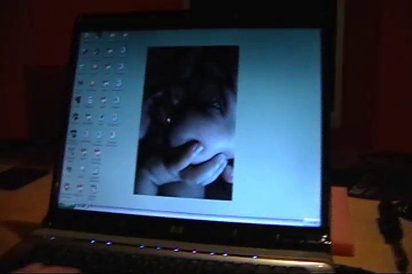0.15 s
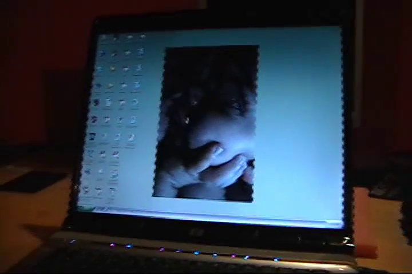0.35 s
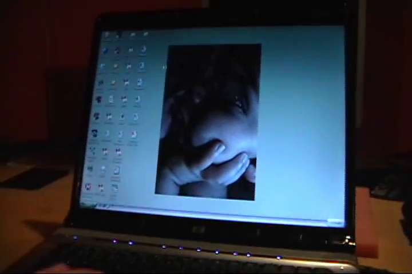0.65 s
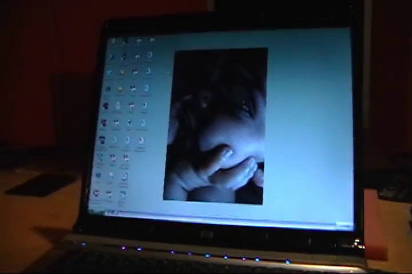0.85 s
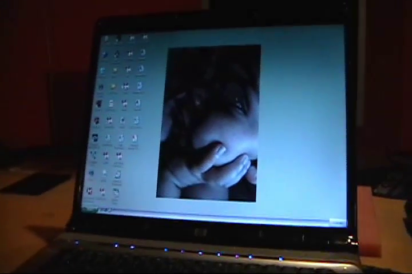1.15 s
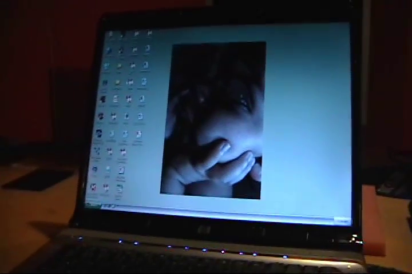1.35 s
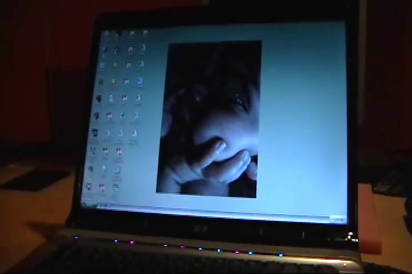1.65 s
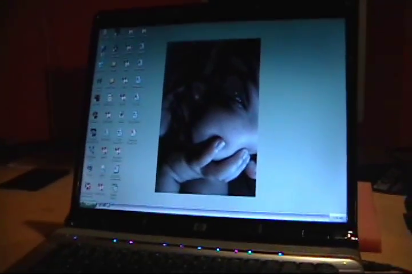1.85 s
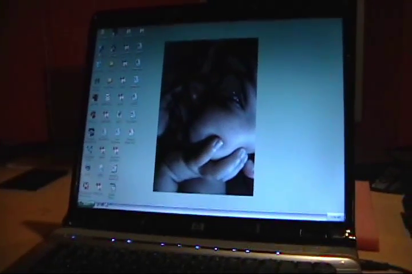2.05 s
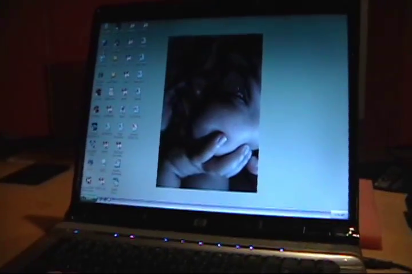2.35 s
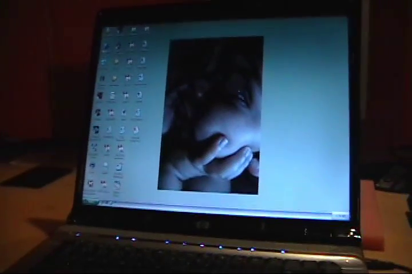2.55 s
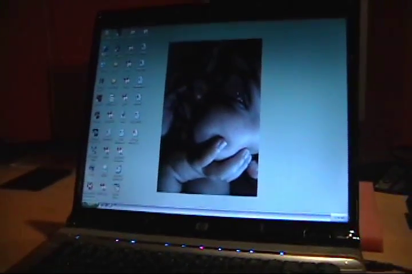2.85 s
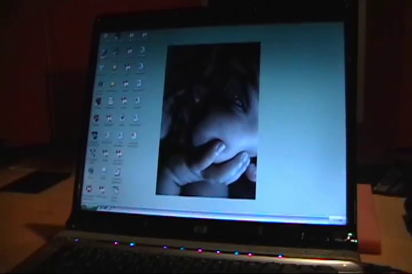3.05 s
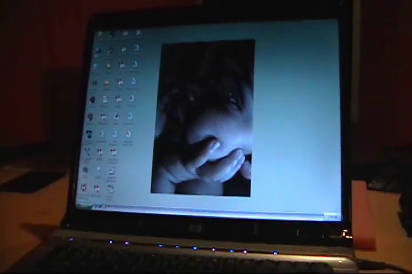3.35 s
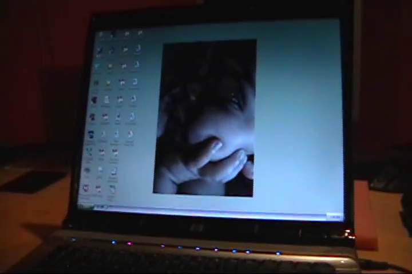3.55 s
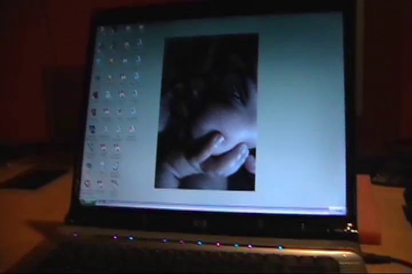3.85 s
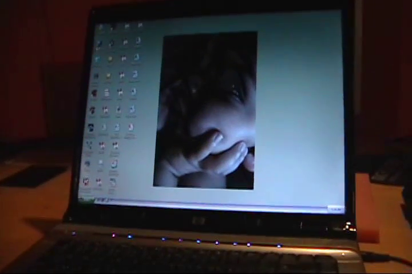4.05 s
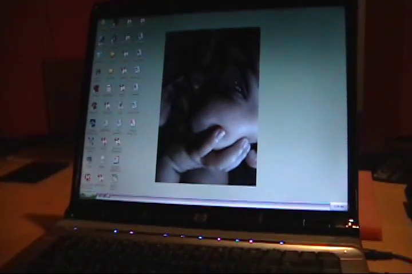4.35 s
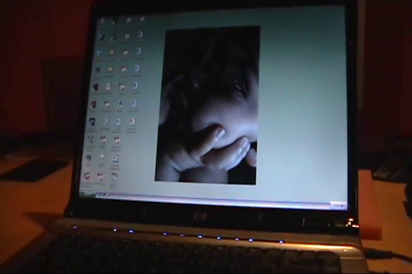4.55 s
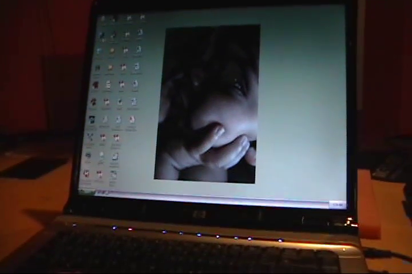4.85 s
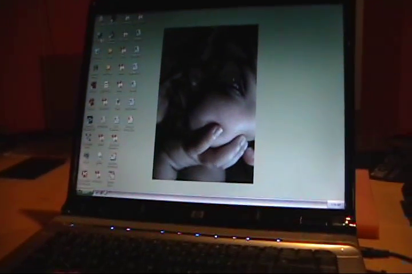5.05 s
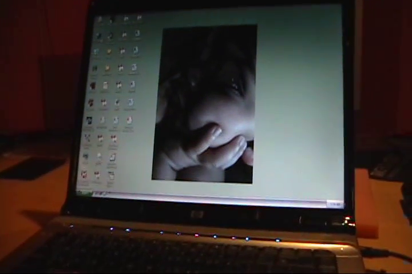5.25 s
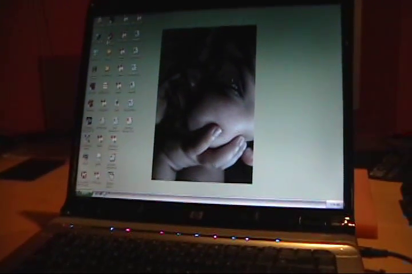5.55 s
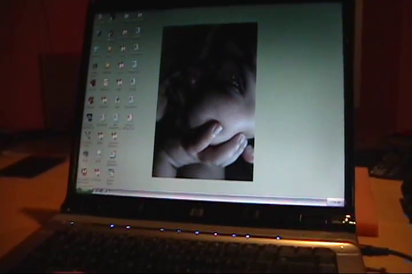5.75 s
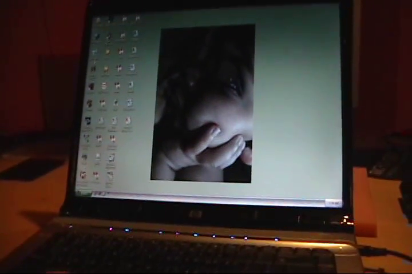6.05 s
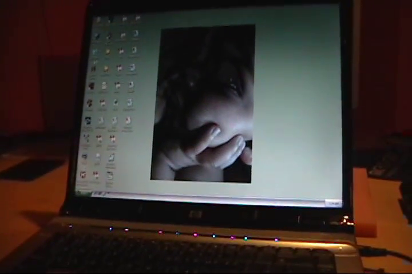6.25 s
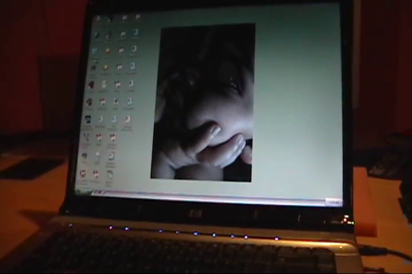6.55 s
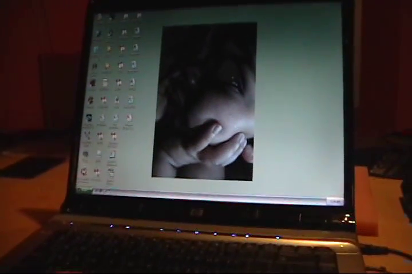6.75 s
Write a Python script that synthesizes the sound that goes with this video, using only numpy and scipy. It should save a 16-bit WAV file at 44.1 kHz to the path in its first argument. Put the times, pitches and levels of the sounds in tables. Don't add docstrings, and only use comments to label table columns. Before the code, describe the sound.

In a quiet room, a low motor hum around 120 hertz dominates, pulsing slowly, with soft fan air beneath it. A thin camera-mechanism whine and buzz sits faintly above. Tiny brittle rattles flutter in uneven bouts, and two dry ticks of the camera case come early, near 0.2 and 0.7 seconds. The handheld camera's microphone hears it all close, small and almost centred.

```python
import sys
import numpy as np
from scipy import signal
from scipy.fft import rfft, irfft
from scipy.io import wavfile
from scipy.ndimage import uniform_filter1d

SR = 44100
rng = np.random.default_rng(int(sys.argv[2]) if len(sys.argv) > 2 else 0)


def invert_db(level):
    return 10 ** (np.asarray(level, dtype=float) / 20)


def materialize(psi):
    bounded = np.clip(np.atleast_2d(psi).T, -1, 1)
    quanta = np.round(bounded * 32767).astype(np.int16)
    wavfile.write(sys.argv[1], SR, quanta)


N = 304731
TIME = np.arange(N) / SR
FREQ = np.arange(N // 2 + 1) * SR / N


def unit(x):
    return x / np.sqrt(np.mean(x ** 2))


def colour(table):
    hz, db = np.transpose(table)
    return invert_db(np.interp(np.log(FREQ + 1), np.log(hz), db)) * np.sqrt(SR / 2)


def ring(hz, width_hz):
    return 1 / (1 + 2j * (FREQ - hz) / width_hz)


def walk(rate):
    k = int(SR / rate)
    held = np.repeat(rng.standard_normal(N // k + 1), k)[:N]
    return unit(uniform_filter1d(uniform_filter1d(held, k), k))


def spread(mid, side):
    return np.array([mid + side, mid - side])


def tone(hz, mid_db, side_db):
    crest_s = 3.5664
    turn = 2 * np.pi * hz * (TIME - crest_s)
    return -np.sqrt(2) * spread(invert_db(mid_db) * np.cos(turn), invert_db(side_db) * np.sin(turn))


def line_scan():
    return tone(15734.3, -94, -120)


def drum():
    drum_hz = 149.8504
    size, count = 4096, 104
    # place as share of a turn, strength in dB, ring as share of a turn.
    head_taps = [(0.269, 3.5, 0.079), (.73, -2.5, 0.059), (0.898, -4, 0.14)]
    # multiple of the turn rate, left level in dB, right level in dB.
    strong_orders = [(1, -67, -67), (2, -67, -80), (3, -71, -74), (4, -69, -74), (6, -72, -76),
                     (12, -80, -75), (14, -72, -71), (16, -73, -70), (18, -86, -77), (20, -79, -77),
                     (22, -81, -82), (36, -83, -84), (38, -77, -83), (40, -84, -85), (50, -83, -87),
                     (52, -86, -85), (54, -82, -81), (60, -84, -101), (61, -83, -93), (62, -79, -103),
                     (66, -100, -86), (74, -87, -99), (77, -87, -101), (85, -86, -87), (86, -80, -82),
                     (88, -83, -83), (90, -87, -87), (91, -85, -85), (92, -86, -86), (94, -87, -87)]
    # frequency in Hz, left level in dB, right level in dB, right lag in rad.
    weak_orders = [(150, -86, -88, 0), (2400, -87, -87, .5), (3000, -85, -92, 2.7), (4200, -85, -96, 2.7),
                   (4800, -92, -92, .5), (6800, -94, -96, .5), (8400, -91, -92, .4), (8900, -88, -96, 2.2),
                   (10200, -93, -90, 1.2), (11800, -89, -96, 1.2), (12400, -89, -92, .2),
                   (13600, -88, -88, 0), (14500, -96, -96, 0), (15600, -101, -101, 0)]

    share = np.arange(size) / size
    shape = sum(invert_db(db) * np.exp(-((share - at) % 1) / decay) for at, db, decay in head_taps)
    lines = rfft(shape * rng.standard_normal(size))[:count + 1]

    hz, *columns = np.transpose(weak_orders)
    order_hz = drum_hz * np.arange(count + 1)
    left_db, right_db, lag = (np.interp(order_hz, hz, column) for column in columns)
    level = unit(abs(lines) ** .5) * invert_db(np.array([left_db, right_db]))
    level[:, 0] = 0
    for k, *db in strong_orders:
        level[:, round(k)] = invert_db(np.array(db))

    phase = lines / abs(lines) * np.exp(-1j * np.outer([0, 1], lag))
    turn = irfft(level * phase, size) * size / np.sqrt(2)
    return np.array([np.interp(TIME * drum_hz % 1, share, channel, period=1) for channel in turn])


def burst(at, peak_db, hz, decay_s, rough):
    t = np.arange(int(.012 * SR)) / SR
    grain = 1 + rough * uniform_filter1d(rng.standard_normal(len(t)), size=24) * np.sqrt(24)
    envelope = (1 - np.exp(-t / 0.00012)) * np.exp(-t / decay_s)
    return int(at * SR), invert_db(peak_db) * grain * envelope * np.sin(2 * np.pi * hz * t)


def handling():
    # start in seconds, peak in dB, frequency in Hz.
    knocks = [(0.1955, -52, 4320), (0.2389, -55, 5770), (0.3237, -52, 4490), (0.7701, -58, 4350),
              (0.9777, -53, 5690), (1.484, -54, 4430), (2.0163, -56, 4640), (3.014, -45, 5630),
              (3.3238, -54, 5730), (3.8691, -48, 4390), (4.0472, -50, 4340), (4.0881, -57, 5640),
              (4.1984, -55, 5480), (4.3246, -54, 5660), (4.5396, -49, 5670), (4.8943, -58, 5710),
              (4.9217, -47, 4350), (5.025, -58, 5700), (5.8696, -52, 5690), (5.9429, -46, 5700),
              (5.9609, -57, 5430), (6.0352, -54, 5630), (6.2367, -61, 5690), (6.3894, -53, 5600),
              (6.4637, -48, 5730), (6.4901, -48, 4400), (6.5405, -50, 4460), (6.6174, -52, 4350),
              (6.8054, -44, 5660), (6.8448, -51, 4640)]
    # start in seconds, peak in dB, left minus right in dB.
    ticks = [
        (0.2389, -40, 0.0),
        (0.7247, -40, -0.5),
    ]
    # delay in seconds, frequency in Hz, dB over the tick, decay in seconds.
    tick_rings = [(.0012, 9000, 15, .0001), (.0012, 5000, 7, .00015), (.0012, 13500, 5, .00008),
                  (.003, 8000, 3, .0002)]

    out = np.zeros((2, N + SR))
    for s, db, hz in knocks:
        i, sound = burst(s, db - 7.0, hz, decay_s=0.0038, rough=0.59)
        out[:, i:i + len(sound)] += sound
    for s, db, pan_db in ticks:
        pan = invert_db(np.array([[pan_db], [-pan_db]]) / 2)
        for delay_s, hz, over_db, decay_s in tick_rings:
            i, sound = burst(s + delay_s, db + over_db, hz, decay_s, rough=.1)
            out[:, i:i + len(sound)] += sound * pan
    return out[:, :N]


def chatter():
    # middle in seconds, length in seconds, strength in dB,
    # high ring over low ring in dB.
    bouts = [(.18, .3, -71, 2), (.53, .25, -70, -5), (.84, 0.31, -72, 1), (1.49, .15, -71.5, 1),
             (2.07, .2, -72.5, 1.5), (2.68, .2, -69, -2), (3.03, 0.073, -69, 2), (3.3, .4, -68.5, -3),
             (3.65, 0.29, -73, -3), (4.15, .3, -70, -1), (4.33, .08, -70.5, 2), (4.53, 0.23, -69.5, 3),
             (4.852, .3, -73, 3), (5.3, 0.44, -71, -3), (5.92, .25, -69.5, 1), (6.06, .08, -72, 4),
             (6.48, .35, -70.5, 1.5), (6.62, .04, -75, 3), (6.83, 0.14, -68, 0)]
    # frequency in Hz, width in Hz.
    modes = [(4480, 800), (5690, 350)]
    rest_db, high_ring_loss_db = -83, 2.5
    clicks_per_s = 1800

    s, length_s, db, high_db = np.transpose(bouts)[:, :, None]
    coarse = TIME[::64]
    swell = np.exp(-(2 * (coarse - s) / length_s) ** 2)
    flurry = invert_db(1.4 * walk(35))
    out = 0
    for lift_db, (hz, width_hz) in zip((0, high_db - high_ring_loss_db), modes):
        power = invert_db(2 * rest_db) + np.sum(invert_db(2 * (db + lift_db)) * swell, axis=0)
        clicks = (rng.random(N) < clicks_per_s / SR) * rng.standard_normal(N)
        clicks = clicks * invert_db(2.8 * walk(130)) * flurry
        rung = unit(irfft(rfft(clicks) * ring(hz, width_hz) ** 2, N))
        out = out + np.interp(TIME, coarse, np.sqrt(power)) * rung
    return spread(out, 0.18 * np.roll(out, 3))


def air():
    # frequency in
    # Hz, level in dB per Hz.
    rush_and_hiss = [(22, -101.0), (40, -84.5), (55, -77.5), (68, -74), (90, -69), (150, -69.5), (200, -63),
                     (280, -69.5), (400, -74), (480, -76), (600, -80), (720, -77.5), (830, -78), (1000, -81.5),
                     (1150, -83.5), (1330, -81), (1500, -86), (2000, -89.5), (2600, -93), (3300, -98),
            (4000, -100.0), (5000, -102.6), (6800, -105.1), (7600, -104.5), (9800, -109.2), (12300, -108.8),
            (13600, -107.7), (15600, -119.2)]
    # frequency in Hz, level in dB per Hz.
    side_noise = [(22, -116), (60, -97), (120, -87), (300, -85), (420, -82), (700, -88), (1050, -88.5),
                  (1200, -92), (1400, -90.5), (2600, -99), (4000, -105), (7000, -110), (11800, -110.5),
                  (13300, -122)]
    # frequency in Hz, width in Hz, lift in dB.
    room = [(94, 8, -4), (134.4, 8.7, 10), (182, 11, -3), (270, 31, 2), (330.4, 13, -8), (347, 10, 5.5),
            (370.6, 8, -1), (412, 9.2, -2), (428, 31, 2.5), (524, 15, -6), (553, 15, 5), (557, 12, -4),
            (623, 11, 2.5), (645, 27, 2), (725, 21, -3), (812, 15, -7.5), (955, 24, -2.5), (1030, 20, 0),
            (1120, 18, 1), (1160, 32, -2), (1402, 20, -2.5), (1388, 20, 3.5), (1490, 40, -2),
            (1573, 30, 4.5), (1600, 30, -1.5), (1850, 30, 1), (1945, 43, -3)]
    # frequency in Hz, left minus right in dB.
    lean = [(250, 1), (500, 0.2), (900, 0), (1300, -1.7), (2400, -2), (4400, -1), (8100, 2.5), (12000, 2)]
    lag_top_hz = 314

    one, other = rfft(rng.standard_normal((2, N)))
    lagged = 1 / (1 + (FREQ / lag_top_hz) ** 4)
    room_db = sum(db * abs(ring(hz, width_hz)) ** 2 for hz, width_hz, db in room)
    mid = one * colour(rush_and_hiss) * invert_db(room_db)
    side = 1j * one * np.sqrt(lagged) + other * np.sqrt(1 - lagged)
    side = side * colour(side_noise)
    hz, db = np.transpose(lean)
    lean_db = np.interp(np.log(FREQ + 1), np.log(hz + 1), db)
    return irfft(spread(mid, side) * invert_db(np.array([lean_db, -lean_db]) / 2), N)


def blades():
    # frequency in Hz, mid in dB, side in dB,
    # pitch wander in Hz, strength wander in dB.
    soft_tones = [(199, -57, -80, 3, 2.5), (701.9, -66, -85, 2, 2), (751.3, -59, -73, .1, .8),
                  (851.7, -69, -87, .6, 1.5), (1062, -70, -85, 7, 3), (1318, -74, -82, 3, 2),
                  (1589.6, -71, -78, .3, 1), (1676, -71, -86, 4, 2.5), (1955, -73, -79, 4, 2)]
    # time in seconds, speed as share of the first.
    fan_speed = [(0, 1), (3.5, 1.0003), (6.91, 1.0025)]

    out = 0
    speed = np.interp(TIME, *np.transpose(fan_speed))
    for hz, mid_db, side_db, wander_hz, wander_db in soft_tones:
        turn = 2 * np.pi * np.cumsum(hz * speed + wander_hz * walk(7)) / SR
        swell = np.sqrt(2) * invert_db(wander_db * walk(9) + 0.5)
        out = out + swell * spread(invert_db(mid_db) * np.cos(turn), invert_db(side_db) * np.sin(turn))
    return out


def motors():
    hum_hz, wobble_hz = 119.99, 15.69
    # multiple of the hum, level in dB, lower wobble line in dB,
    # upper wobble line in dB, side minus mid in dB.
    hum = [(1, -34.5, -53, -57, -20.5), (2, -45, -62.5, -63.5, -22), (3, -82, -73, -63, -10),
           (4, -67.5, -62, -62.5, -21)]
    # frequency in Hz, mid in dB, side in dB.
    steady_tones = [(117.19, -50.7, -69.6), (234.37, -47.8, -66.8), (351.15, -65.1, -82.4),
                    (54.54, -67.1, -88.0), (80.41, -54.2, -73.7), (90.78, -63.5, -81.9),
                    (155.72, -59.1, -77.6), (169.7, -59.7, -78.7), (309.24, -66.2, -93.5),
                    (320.41, -71.0, -83.2), (425.64, -67.2, -60.0), (455.62, -77.1, -61.3),
                    (525.98, -65.4, -100.0), (550.98, -70.5, -100.0), (767.77, -72.1, -89.9),
                    (391.35, -54, -65), (388.97, -62, -73), (393.5, -66, -77), (395.7, -65, -76),
               (200.4, -56, -80), (1593.96, -75, -80), (3326.7, -87, -95), (4147.9, -86, -95),
               (4338.9, -86, -95), (4396.9, -85, -95), (6293.7, -88, -95)]

    out = sum(tone(*row) for row in steady_tones)
    for k, db, low_db, high_db, side_db in hum:
        hz = round(k) * hum_hz
        flip = (-1) ** (round(k) + 1)
        out = out + tone(hz, db, db + side_db)
        out = out + flip * tone(hz - wobble_hz, low_db, low_db + side_db)
        out = out + flip * tone(hz + wobble_hz, high_db, high_db + side_db)
    return out


def scene():
    return line_scan() + drum() + handling() + chatter() + air() + blades() + motors()


def top_cut(x):
    return signal.sosfilt(signal.butter(12, 15745, fs=SR, output="sos"), x)


def record(dry):
    mix = dry - .0004
    return top_cut(mix)


dry = scene()
out = record(dry)
materialize(out)
```